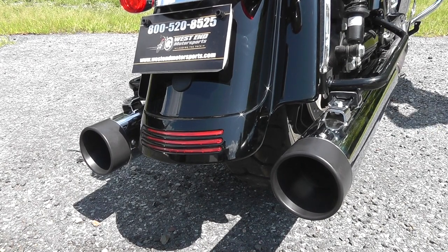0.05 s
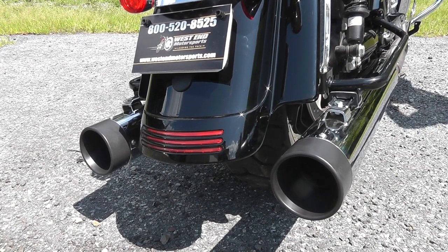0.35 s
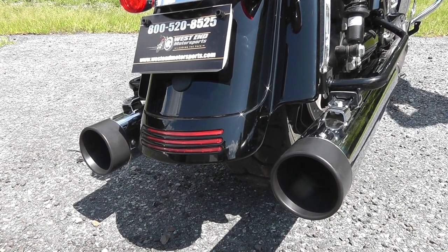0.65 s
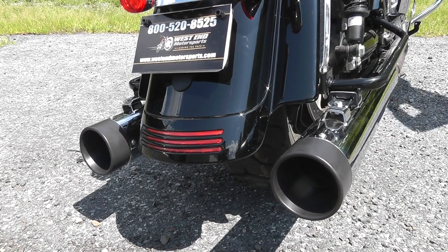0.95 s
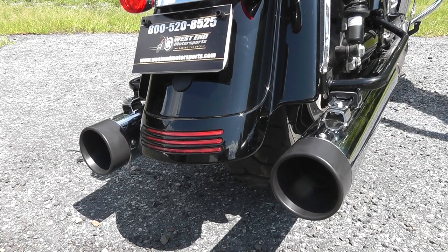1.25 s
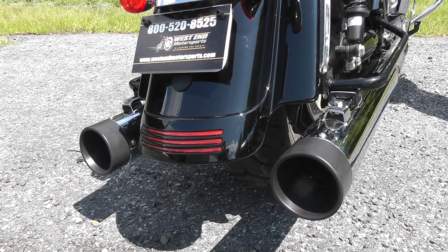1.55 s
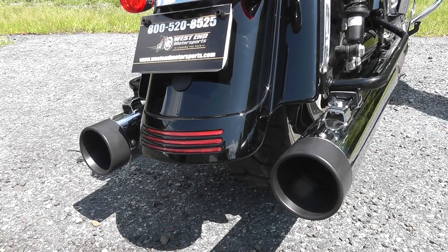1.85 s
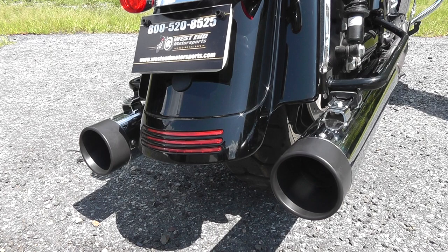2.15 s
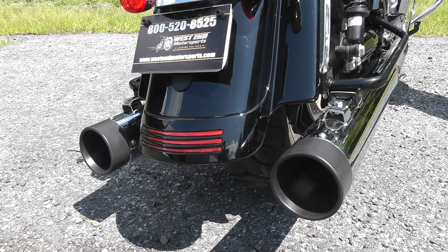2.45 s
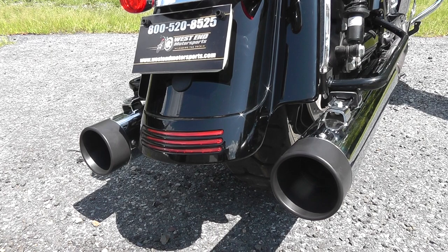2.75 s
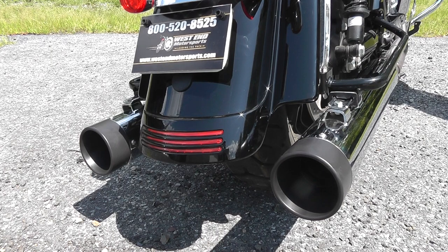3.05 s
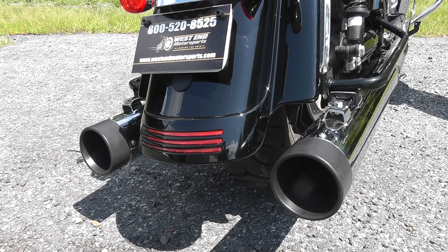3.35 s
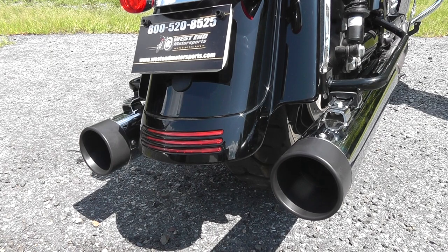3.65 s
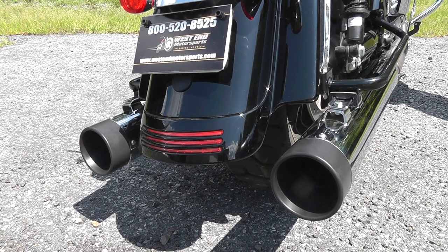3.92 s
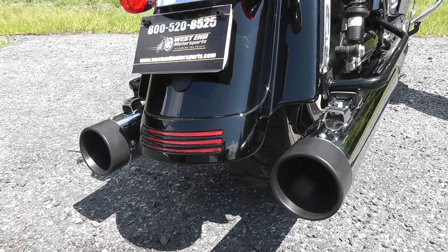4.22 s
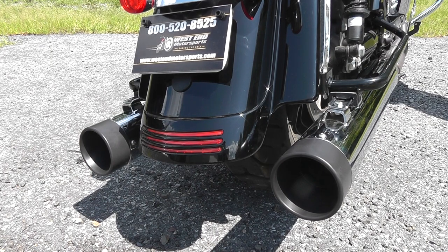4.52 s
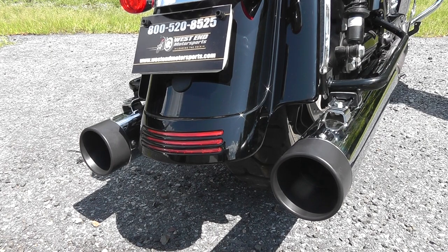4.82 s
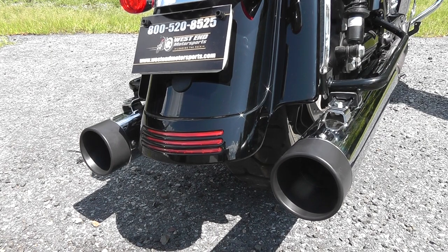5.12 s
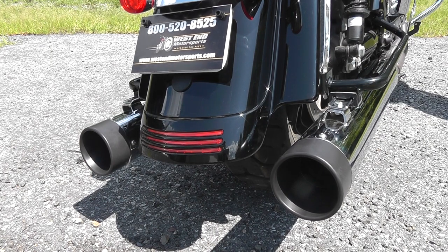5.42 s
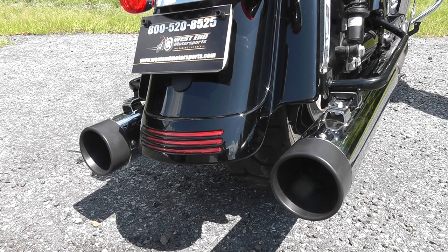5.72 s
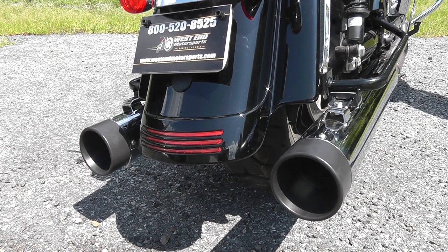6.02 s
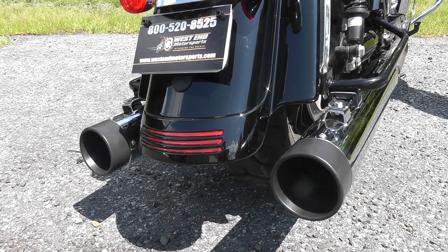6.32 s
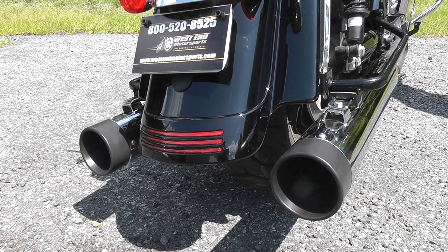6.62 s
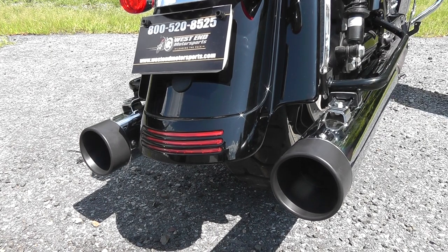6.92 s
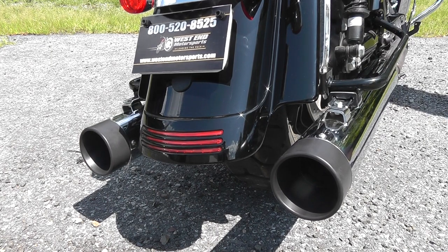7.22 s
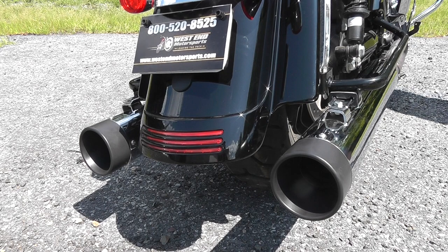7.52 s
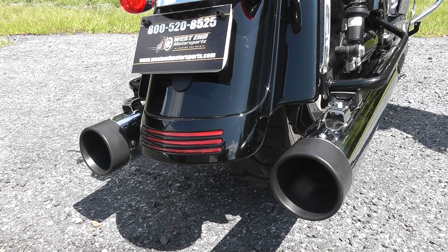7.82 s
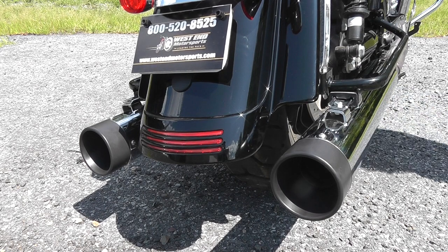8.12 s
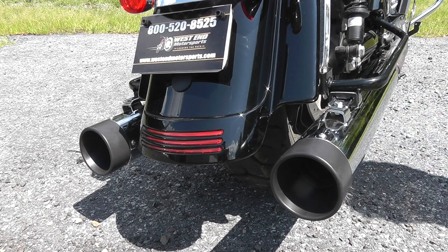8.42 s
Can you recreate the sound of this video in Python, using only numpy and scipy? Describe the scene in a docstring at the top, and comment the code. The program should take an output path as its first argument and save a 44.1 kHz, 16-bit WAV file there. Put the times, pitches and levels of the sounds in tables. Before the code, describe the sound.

A large V-twin motorcycle idles outdoors, heard from just behind its exhaust pipes. The deep thumping beat lopes unevenly, with louder pops, short spits of hiss and a soft mechanical rustle underneath. Near the end the ignition is cut; the engine turns over a few more times and stops, and a faint whirr dies away.

```python
"""Open asphalt, just behind the exhaust pipes of a big V-twin motorcycle idling with an uneven lope.
The rear cylinder carries the beat; the front one catches about every third cycle and pops.
Each firing thumps the pipe's air column and spits a jet of hiss; the swinging gas gulps and knocks
at the outlet. The ignition is cut, the engine pumps a few more times and stops, and a faint whirr
dies away."""
import sys
import numpy as np
from scipy import signal
from scipy.fft import rfft, irfft, next_fast_len
from scipy.io import wavfile
from scipy.ndimage import uniform_filter1d

SR = 44100
rng = np.random.default_rng(int(sys.argv[2]) if len(sys.argv) > 2 else 0)


def generate_wav(signal):
    """Clip the signal to [-1, 1] and save it as 16-bit WAV at the path in sys.argv[1]."""
    frames = np.transpose(np.atleast_2d(signal))
    scaled = np.clip(frames, -1, 1) * 32767
    pcm = np.round(scaled).astype(np.int16)
    wavfile.write(sys.argv[1], SR, pcm)


N = 377496

# Front cylinder pops; all stroke levels are relative: (time [s], hiss [dB], blowdown push [-],
# nominal whistle [Hz], first gulp [dB], second gulp [dB], bark [dB])
FRONT_POPS = [(0.303, -12.0, 0.69, 4300, -15, -21.5, -23), (0.647, -14, 0.5, 3840, -19, -22, -26),
              (0.996, -11, 0.53, 4110, -15, -21.5, -37), (1.348, -10.5, 0.57, 4080, -20, -22, -20),
              (1.699, -10, 0.64, 4090, -25, -26, -29), (2.052, -10.0, 0.4, 4140, -19.5, -22.5, -30),
              (2.281, -12.5, 0.46, 3970, -37, -29, -33), (2.521, -12.5, 0.49, 3820, -17, -30, -29.0),
              (2.768, -13.0, 0.42, 4226, -42, -47, -31.5), (2.889, -22.5, 0.35, 4250, -18, -25.5, -23.5),
              (3.01, -20.5, 0.47, 4040, -25, -37, -29), (3.134, -18.5, 0.27, 4080, -37, -41, -42),
              (3.255, -16.5, 0.42, 3870, -24, -26, -38), (3.373, -22.5, 0.29, 4170, -21, -31, -34),
              (3.493, -13, 0.46, 4156, -17.5, -32, -36.5), (3.733, -16, 0.58, 3740, -28, -28.5, -36),
              (3.855, -16.5, 0.5, 4095, -19.5, -34, -31.0), (4.092, -11.5, 0.64, 4150, -14, -25, -26),
              (4.433, -13.5, 0.62, 4380, -17, -25, -25), (4.787, -9.5, 0.61, 4204, -25, -26, -26.5),
              (5.143, -13, 0.47, 4170, -24, -25.5, -29), (5.373, -22.5, 0.18, 3890, -29.5, -35, -33.5),
              (5.495, -13.5, 0.79, 4230, -18.0, -24.5, -33), (5.844, -11.5, 0.57, 4110, -27, -26, -27),
              (6.184, -13.5, 0.65, 3870, -18, -21, -28.0), (6.519, -11, 0.54, 3990, -15.5, -23, -36),
              (6.877, -13, 0.54, 3830, -17, -20.5, -28.0), (7.23, -10, 0.55, 3850, -23, -21.5, -19.5),
              (7.342, -23.5, -0.15, 3920, -19, -37, -41.0), (7.576, -8.5, 0.44, 4250, -28, -26, -28)]
# Front strokes that only pump: (time [s], gulp delay [ms], gulp [dB])
FRONT_SKIPS = [(0.055, 7, -22.0), (0.18, 6, -36.0), (0.418, 6, -22.0), (0.533, 7, -29.5), (0.762, 7, -20.5),
               (0.879, 7, -26.0), (1.114, 5, -18.5), (1.232, 7, -30.0), (1.464, 6, -19.0),
               (1.581, 6, -27.0), (1.819, 2, -23.0), (1.938, 1, -31.0), (2.174, 0, -30.0),
               (2.402, 6, -23.5), (2.647, 5, -22.0), (3.616, 4, -21.5), (3.978, 9, -29.5),
               (4.206, 7, -27.0), (4.322, 8, -29.5), (4.55, 8, -28.0), (4.67, 4, -24.0), (4.904, 6, -24.0),
               (5.023, 5, -30.5), (5.261, 8, -31.5), (5.611, 6, -21.5), (5.728, 7, -25.0), (5.96, 7, -22.0),
               (6.074, 7, -31.5), (6.296, 6, -21.5), (6.406, 6, -17.5), (6.64, 4, -30.0),
               (6.761, 11, -29.5), (6.995, 5, -22.5), (7.114, 7, -31.0), (7.46, 5, -25.0)]


def amp(db):
    """Decibels to gain."""
    return 10 ** (np.asarray(db) / 20)


def unit(x):
    """Scale to rms 1."""
    return x / np.sqrt(np.mean(x ** 2) + 1e-20)


def sample(s):
    """Sample index of time s."""
    return max(0, round(s * SR))


def add(track, s, piece):
    """Mix a piece into a track at time s."""
    i = sample(s)
    track[i:i + len(piece)] += piece[:max(0, len(track) - i)]


def filtered(x, response):
    """Apply a complex frequency response."""
    n = x.shape[-1]
    padded = next_fast_len(n + n // 8)
    return irfft(rfft(x, padded) * response(np.fft.rfftfreq(padded, 1 / SR)), padded)[..., :n]


def lowpass(x, hz, order):
    """Zero-phase low-pass, -6 dB at hz."""
    return filtered(x, lambda f: 1 / (1 + (f / hz) ** order))


def noise(spectrum, patchy_db=0):
    """Noise of rms 1 with a (Hz, dB) spectrum; its colour flickers at random by patchy_db."""
    hz, db = np.transpose(spectrum)
    x = rng.standard_normal(N)
    if patchy_db:
        bins = signal.stft(x, nperseg=256)[2]
        flicker = uniform_filter1d(rng.standard_normal(bins.shape), size=2, axis=0)
        flicker = unit(uniform_filter1d(flicker, size=5, axis=1))
        x = signal.istft(bins * amp(patchy_db * flicker), nperseg=256)[1][:N]
    return unit(filtered(x, lambda f: amp(np.interp(np.log(f + 1), np.log(hz), db))))


def shaped(source, s, envelope):
    """Source from time s under an envelope, scaled to the envelope's energy."""
    piece = source[sample(s):][:len(envelope)] * envelope
    return unit(piece) * np.sqrt(np.mean(envelope ** 2))


def swell(ms, at_ms, width_ms):
    """Gaussian of peak 1."""
    return np.exp(-((ms - at_ms) / width_ms) ** 2 / 2)


def puff(ms, at_ms, width_ms):
    """Pressure bump of unit area."""
    return swell(ms, at_ms, width_ms) / (width_ms * np.sqrt(2 * np.pi))


def burst(ms, peak_ms, sharp):
    """Envelope that reaches 1 at peak_ms, then dies."""
    return (ms / peak_ms * np.exp(1 - ms / peak_ms)) ** sharp


def resonance(f, hz, width_hz):
    """Causal response of one damped mode."""
    return 1j * f * width_hz / (hz * hz - f * f + 1j * f * width_hz)


def exhaust_strokes():
    """All strokes: cylinder (0 rear, 1 front), then the columns of rear_strokes."""
    # Faint rows are misfires: (time [s], hiss [dB], blowdown push [-], nominal whistle [Hz],
    # first gulp [dB], second gulp [dB])
    rear_strokes = [(0.001, -23.5, 0.63, 3020, -19, -25), (0.117, -46, -0.15, 2930, -44, -44.5),
                    (0.251, -18.5, 0.59, 2950, -14.5, -40), (0.366, -15.5, 0.84, 2940, -20, -21.0),
                    (0.478, -16, 0.68, 3190, -20, -26), (0.596, -13.5, 0.84, 2950, -21.5, -22),
                    (0.708, -23.5, 0.75, 3140, -22, -20.5), (0.823, -16.5, 0.78, 2930, -22.5, -26.5),
                    (0.944, -17.0, 0.6, 2840, -21.5, -33.0), (1.059, -20, 0.66, 3000, -20, -21),
                    (1.175, -20, 0.7, 2900, -19.5, -30), (1.297, -19, 0.72, 2980, -17.5, -49),
                    (1.41, -23.5, 0.56, 3040, -36, -27.5), (1.525, -20, 0.89, 2950, -15.5, -27),
                    (1.645, -21, 0.45, 2820, -34, -50), (1.764, -20.5, 0.65, 3130, -21.5, -23),
                    (1.881, -60, -0.26, 2660, -45, -44), (2.002, -13.5, 1, 3006, -16.5, -21),
                    (2.122, -40, -0.17, 2890, -44, -45), (2.231, -13.5, 0.65, 2850, -16.5, -29),
                    (2.346, -19.5, 0.67, 3040, -15, -22), (2.465, -20, 0.65, 2770, -20.5, -34),
                    (2.591, -18, 0.67, 2780, -13, -28.5), (2.71, -22, 0.5, 3100, -25, -41),
                    (2.839, -25, 0.6, 3120, -38, -27), (2.962, -31, -0.21, 2750, -27, -51),
                    (3.083, -10, 0.78, 2970, -16, -32), (3.205, -16.5, 0.59, 2900, -19.5, -30),
                    (3.323, -19, 0.66, 2920, -16, -28), (3.441, -20, 0.58, 2760, -19.5, -37),
                    (3.56, -17.5, 0.68, 3070, -20, -24), (3.68, -17.5, 0.51, 2810, -23, -35),
                    (3.804, -15.5, 0.76, 2990, -14.5, -42), (3.922, -17.5, 0.62, 3040, -18.5, -24),
                    (4.042, -17.0, 0.69, 3016, -16.5, -31), (4.154, -19, 1, 2850, -25.5, -21),
                    (4.267, -17, 0.86, 2814, -15.5, -23.5), (4.385, -16, 0.8, 3010, -16, -29),
                    (4.495, -27, 0.41, 2934, -38, -30), (4.613, -18, 0.81, 3120, -15, -21),
                    (4.735, -19.5, 0.68, 2960, -31, -38), (4.851, -18.0, 0.68, 3090, -25.0, -22),
                    (4.964, -20.5, 0.62, 2925, -22, -31), (5.09, -16, 0.84, 3050, -18.5, -29),
                    (5.203, -30, 0.3, 2860, -44.5, -35), (5.325, -16, 0.79, 2950, -15.5, -27),
                    (5.444, -18.5, 0.69, 2920, -15, -23.5), (5.557, -16.5, 0.91, 3084, -19, -22),
                    (5.672, -16.5, 0.95, 2900, -12.5, -23), (5.792, -16.5, 0.69, 2780, -17, -48),
                    (5.908, -19.0, 0.82, 3120, -25, -23.5), (6.018, -18.5, 0.69, 2690, -18.5, -25.0),
                    (6.136, -16.0, 0.79, 3070, -27, -37), (6.245, -18, 0.7, 3120, -24, -24.5),
                    (6.352, -16.5, 0.86, 3000, -24.0, -18), (6.467, -14.5, 0.92, 3060, -19.5, -32),
                    (6.583, -22.5, 0.38, 2770, -38, -27.5), (6.705, -11, 0.86, 2930, -21, -28),
                    (6.825, -18.5, 0.68, 2760, -14.5, -31), (6.941, -14, 0.85, 2790, -15.5, -21.5),
                    (7.056, -15.5, 0.71, 2800, -17, -24.5), (7.179, -16, 0.75, 3010, -14.5, -30),
                    (7.292, -19.5, 0.68, 3036, -20, -19), (7.403, -15, 0.87, 3120, -18, -23.5),
                    (7.524, -16, 0.67, 2720, -16.5, -34)]
    # Ignition off, rear and front in turn; push < 0 sucks: (time [s], push [-], hiss and gulps [dB])
    coasting = [(7.646, -0.23, -31), (7.699, -0.14, -31), (7.779, -0.11, -35), (7.849, -0.011, -35),
                (7.957, 0.0064, -40), (8.061, 0.0083, -50), (8.145, -0.0065, -80)]
    unfired_hz, unfired_gulp_db, skip_push = 3820, -43, 0.02
    rows = [(0, *row) for row in rear_strokes] + [(1, *row[:-1]) for row in FRONT_POPS]
    for s, *_ in FRONT_SKIPS:
        hiss_db = rng.normal(-39, 2.5)
        rows.append((1, s, hiss_db, skip_push, unfired_hz, unfired_gulp_db, unfired_gulp_db))
    return rows + [(k % 2, s, db, push, unfired_hz, db, db) for k, (s, push, db) in enumerate(coasting)]


def thumps(strokes, pumping):
    """Each exhaust stroke drives the modes of the pipe's air column."""
    # (frequency [Hz], width [Hz], signed gain from rear [-], from front [-])
    pipe_modes = [(49.5, 19.9, 10.5, 16), (102, 10.3, -16, -21), (159.6, 9.7, 1.7, -11.5),
                  (176.3, 33, -0.5, 6.5), (200.4, 21.2, 1.48, 16.5), (285, 49, 0.9, -2.5)]
    ms = np.arange(SR // 10) * 1000 / SR
    blowdown = [puff(ms, at_ms=4.3, width_ms=0.093), puff(ms, at_ms=3.52, width_ms=1.15)]
    # The throttled cylinder sucks as its valve opens, and again at valve overlap.
    suction = 0.28 * puff(ms, at_ms=3.35, width_ms=2.2) + 0.57 * puff(ms, at_ms=37.4, width_ms=4.6)
    ports = np.zeros((2, N))
    for cylinder, s, _, push, *_ in strokes:
        add(ports[cylinder], s, push * blowdown[cylinder] - pumping[sample(s)] * suction)

    def pipe(f):
        column = sum(np.array([[rear], [front]]) * resonance(f, hz, width_hz)
                     for hz, width_hz, rear, front in pipe_modes)
        outlet = f * f / (f * f - 23.3j * f - 29 ** 2)  # an open end radiates no steady flow
        return column * outlet

    return filtered(ports, pipe).sum(0)


def muffler(pressure, ceiling):
    """Flow losses squash the biggest swings; the packing soaks up the upper harmonics."""
    squashed = pressure / (1 + (pressure / ceiling) ** 4) ** (1 / 4)
    return lowpass(squashed, hz=290, order=10)


def jets(strokes, pumping):
    """A firing spits hiss and whistles, washes through the muffler until the valve shuts, and churns."""
    # Gas flow spectra: (frequency [Hz], level [dB])
    rear_jet = [(150, -29), (500, -5), (1000, -18), (2100, -80), (3000, -11), (3700, -7), (4400, -2.5),
                (6000, -2), (7800, -1.5), (9000, 5), (10500, -9.5), (13200, -3), (15500, -49)]
    front_jet = [(150, 10), (500, -7.5), (1000, -35), (2400, -38), (3200, -5.5), (3500, -10), (4100, 1.5),
                 (5000, -9.5), (6500, -6.5), (9000, -2), (10500, -9), (13200, -8), (15500, -29)]
    wash_spectrum = [(150, -30), (500, -0.5), (1100, -7), (1400, -3.5), (2000, -3), (2700, -3), (4200, -2),
                     (6000, -9.5), (9000, -8.5), (10500, -20), (13500, -29), (15500, -53)]
    churn_spectrum = [(30, -53), (55, 5.5), (85, 11), (130, 2), (165, 4.5), (205, 1.5), (250, -8.5),
                      (300, -9), (370, -22.5), (700, -80)]
    # Tailpipe cross modes: (ratio to whistle pitch [-], level [dB])
    rear_whistles = [(1, -5.5), (1.85, -15), (3.0, -8)]
    front_whistles = [(.7, -15), (1, -4), (1.279, -13.5), (1.6, -12.5)]
    # Jet envelopes, rear then front: (peak time [ms], sharpness [-])
    spit_shapes = [(5.6, 3.2), (5.1, 2.4)]
    valve_open_ms, lead_s, tilt_db = 56, (0.0003, 0.0005), 2.0
    ms = np.arange(SR // 8) * 1000 / SR
    spits = [burst(ms, *shape) for shape in spit_shapes]
    trail = burst(ms, peak_ms=11.7, sharp=0.28) / (1 + (ms / valve_open_ms) ** 12)
    swirl = burst(ms, peak_ms=34, sharp=0.58)
    climb = 1 + 0.14 * (np.tanh(ms / 9) - 0.5)  # whistles rise as the jet gathers speed
    hisses = np.array([noise(rear_jet, patchy_db=3.5), noise(front_jet, patchy_db=5)])
    dark = lowpass(hisses, hz=6000, order=8)
    jet, wash_level, churn_level = np.zeros((3, N))
    for cylinder, s, hiss_db, push, whistle_hz, *_ in strokes:
        opens_s, spit, flow = s - lead_s[cylinder], spits[cylinder], pumping[sample(s)]
        tilt = amp(rng.normal(0, tilt_db)) - 1  # darker or brighter by chance
        hiss = hisses[cylinder] + tilt * dark[cylinder]
        add(jet, opens_s, shaped(hiss, s, amp(hiss_db) * spit))
        add(wash_level, s, (amp(-33) * flow ** 2 + amp(hiss_db - 19.5)) * trail)
        add(churn_level, s, (flow + 0.49 * abs(push)) * swirl)
        for ratio, mode_db in [rear_whistles, front_whistles][cylinder]:
            jitter_rad = rng.normal(0, 0.035, len(ms))
            phase = np.cumsum(2 * np.pi * ratio * whistle_hz * climb / SR + jitter_rad)
            whistle_db = hiss_db + mode_db + rng.normal(2.5, 1.47)
            add(jet, opens_s, amp(whistle_db) * spit * np.sin(phase))
    wash = wash_level * noise(wash_spectrum, patchy_db=5)
    churn = amp(-25.5) * churn_level * noise(churn_spectrum)
    return jet + wash + churn


def gulps(strokes):
    """Air knocks and tears at the outlet's lip as the gas swings back in."""
    # Rasp at the lip: (frequency [Hz], level [dB])
    rasp_spectrum = [(150, -36), (500, 0.5), (720, -8.5), (1030, 12), (1350, -9), (1850, 11), (2300, -1),
                     (2800, -7.5), (4200, -7.5), (6000, -13), (9000, -9), (10500, -21), (15000, -46)]
    ms = np.arange(SR // 10) * 1000 / SR
    after_blowdown = swell(ms, at_ms=16.16, width_ms=2.2)
    at_overlap = swell(ms, at_ms=40.5, width_ms=4)
    rasp, inflow = noise(rasp_spectrum, patchy_db=6), np.zeros(N)
    for _, s, *_, first_db, second_db in strokes:
        add(inflow, s, shaped(rasp, s, amp(first_db) * after_blowdown))
        add(inflow, s, shaped(rasp, s, amp(second_db + 1.2) * at_overlap))
    for s, delay_ms, db in FRONT_SKIPS:
        add(inflow, s, shaped(rasp, s, amp(db) * swell(ms, delay_ms, width_ms=3)))
    return amp(-2) * inflow


def bark():
    """Short throaty bark on each front cylinder pop."""
    # (frequency [Hz], level [dB])
    bark_spectrum = [(150, -20), (300, -2), (420, -8), (620, 1), (850, -12), (1500, -27), (4000, -60)]
    ms = np.arange(SR // 20) * 1000 / SR
    envelope = burst(ms, peak_ms=3.5, sharp=0.75)
    source, barks = noise(bark_spectrum), np.zeros(N)
    for s, *_, db in FRONT_POPS:
        add(barks, s, shaped(source, s, amp(db + 0.5) * envelope))
    return barks


def clatter(level_db):
    """Valve train and primary drive blend into a soft rustle."""
    # (frequency [Hz], level [dB])
    clatter_spectrum = [(150, 8), (340, 8), (490, 15.5), (720, 3), (1050, 9), (1400, 1), (1900, -5.5),
                        (2700, -6.5), (4200, -40), (6000, -50), (9000, -55), (11000, -22), (15500, -38)]
    return amp(level_db) * noise(clatter_spectrum, patchy_db=7.5)


def whirr(t):
    """A faint whirr comes up as the crank stops, holds briefly and dies."""
    # (frequency [Hz], level [dB])
    whirr_spectrum = [(120, -30), (200, -6), (315, -10.5), (422, -9), (462, -17), (497, -12.5), (890, -16),
                      (1330, -21), (2060, -23.5), (5390, -23.5), (15500, -34.5)]
    hold_from_s, hold_to_s, rise_db_per_s, fall_db_per_s = 7.86, 8.345, 34, 60
    rise_db = rise_db_per_s * np.minimum(t - hold_from_s, 0)
    fall_db = fall_db_per_s * np.maximum(t - hold_to_s, 0)
    return amp(-45 + rise_db - fall_db) * noise(whirr_spectrum)


def scatter(x):
    """Mids and treble come off the bike and the rough ground with scrambled phases."""
    bins = signal.stft(x - lowpass(x, hz=350, order=4), nperseg=128)[2]
    scrambled = bins * np.exp(2j * np.pi * rng.random(bins.shape))
    return signal.istft(scrambled, nperseg=128)[1][:N]


def air(level_db):
    """Steady outdoor rumble and faint hiss."""
    # (frequency [Hz], level [dB])
    air_spectrum = [(20, -20), (35, 18), (97, 9), (213, 8), (263, -9), (639, -43), (2180, -19), (6890, -24),
                    (14000, -30), (15500, -55)]
    return amp(level_db) * noise(air_spectrum)


def scene():
    """The bike in opposite polarity on the two channels, left louder; faint scatter on both alike."""
    # Engine state: (time [s], piston pumping [0-1], clatter [dB])
    running = [(0, 1, -28), (.2, 0.68, -38), (.32, 0.92, -33.5), (7.6, 0.72, -33), (7.8, 0.7, -35),
               (7.96, 0.58, -38), (8.08, 0.3, -35.5), (8.16, 0.02, -59), (8.24, 0, -53), (8.56, 0.1, -64)]
    t = np.arange(N) / SR
    times_s, *columns = np.transpose(running)
    pumping, clatter_db = [np.interp(t, times_s, column) for column in columns]
    strokes = exhaust_strokes()
    boom = muffler(thumps(strokes, pumping), ceiling=0.75)
    rush = air(-51) + jets(strokes, pumping) + gulps(strokes) + bark() + clatter(clatter_db) + whirr(t)
    direct = boom * amp([[1.6], [-1.95]]) + rush * amp([[1.45], [-1.65]])
    return direct * [[-1], [1]] + amp(-16.5) * scatter(rush) + air(-66)


def record(dry):
    """Microphone low cut, soft overload on the loudest pops, band limit."""
    ceiling, top_hz = 1.05, 15768
    heard = dry - lowpass(dry, hz=34.8, order=8)
    clipped = heard / (1 + np.abs(heard / ceiling) ** 10) ** (1 / 10)
    return filtered(clipped, lambda hz: hz < top_hz)


dry = scene()
out = record(dry)
generate_wav(out)
```